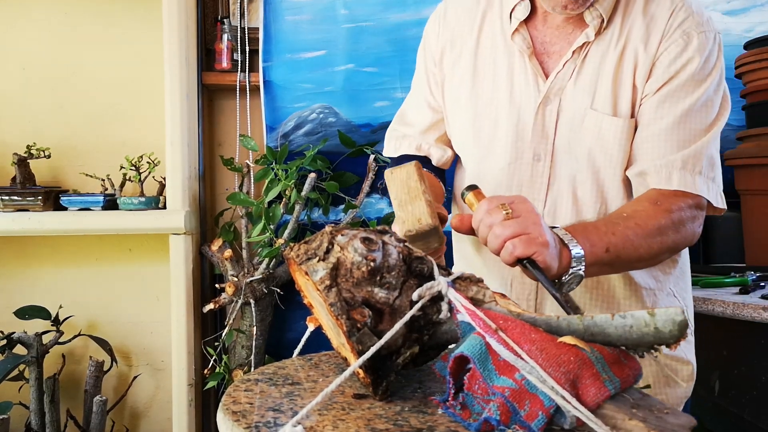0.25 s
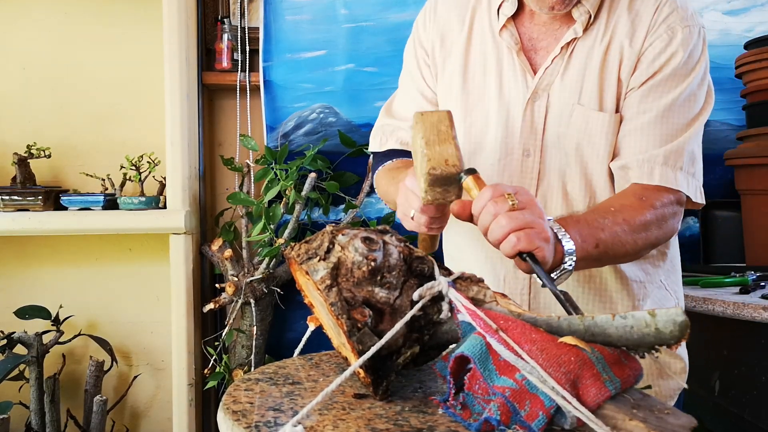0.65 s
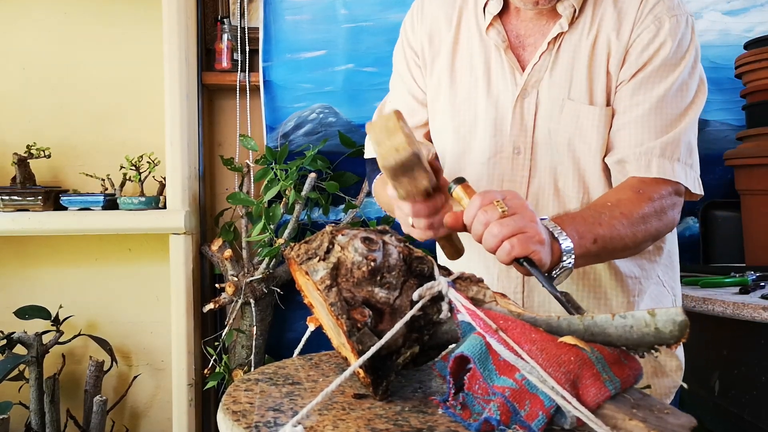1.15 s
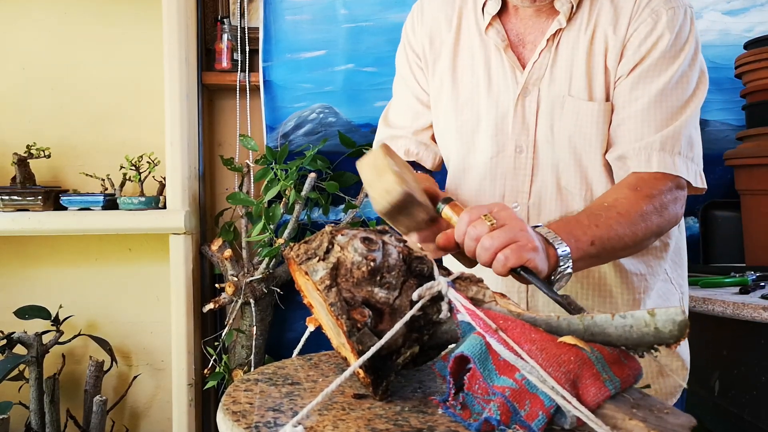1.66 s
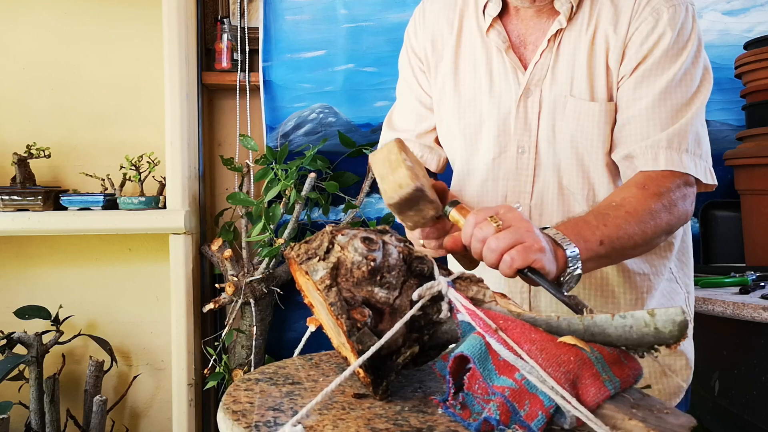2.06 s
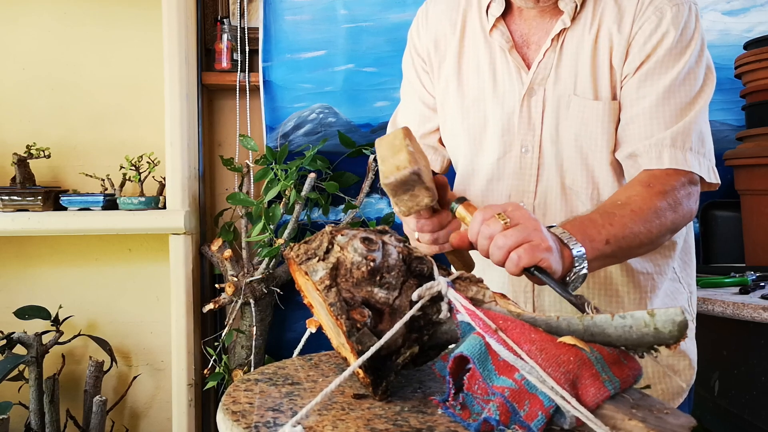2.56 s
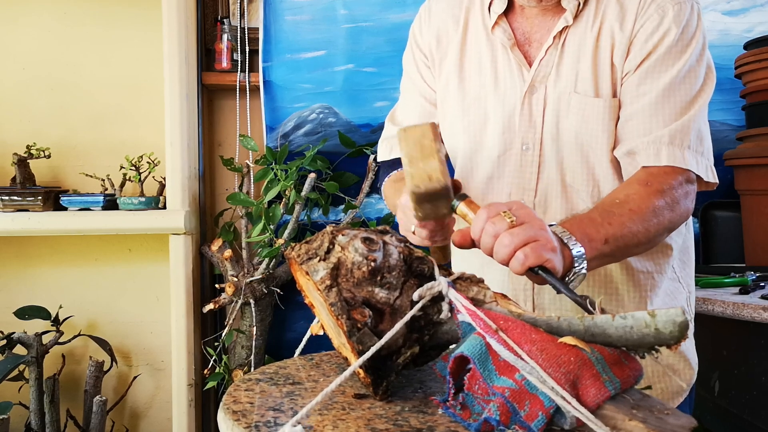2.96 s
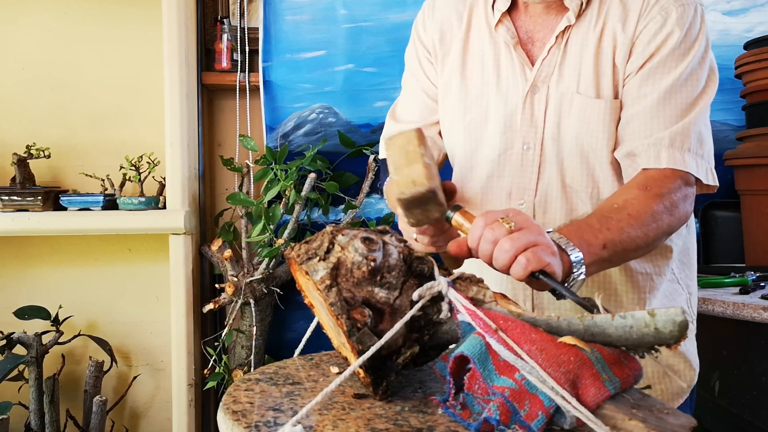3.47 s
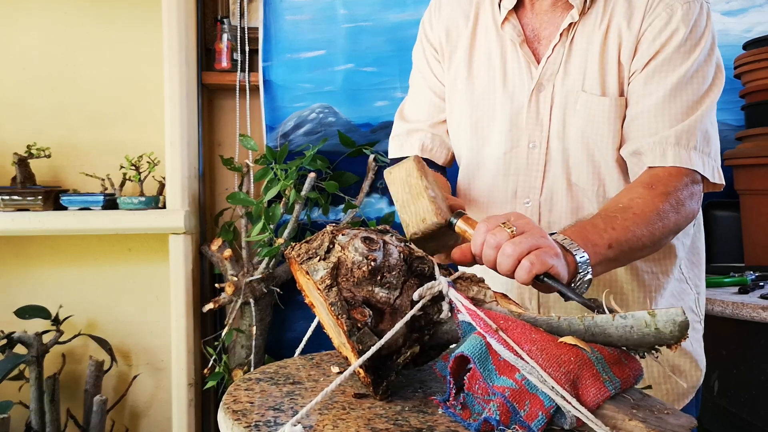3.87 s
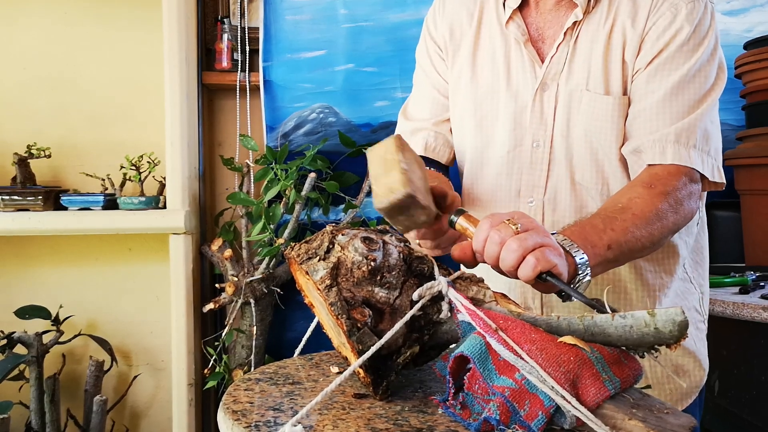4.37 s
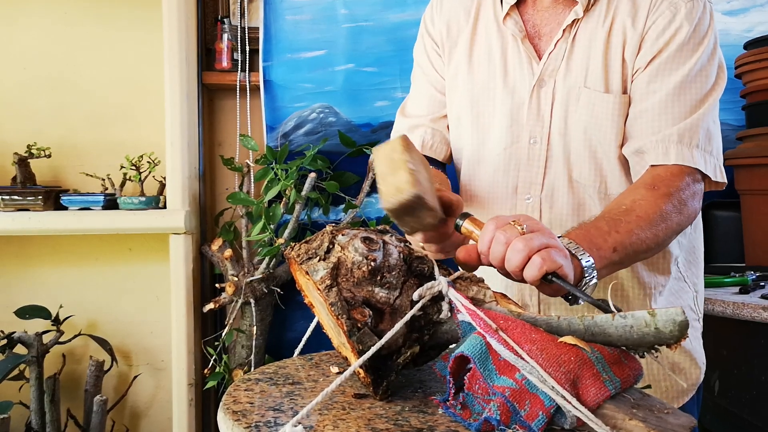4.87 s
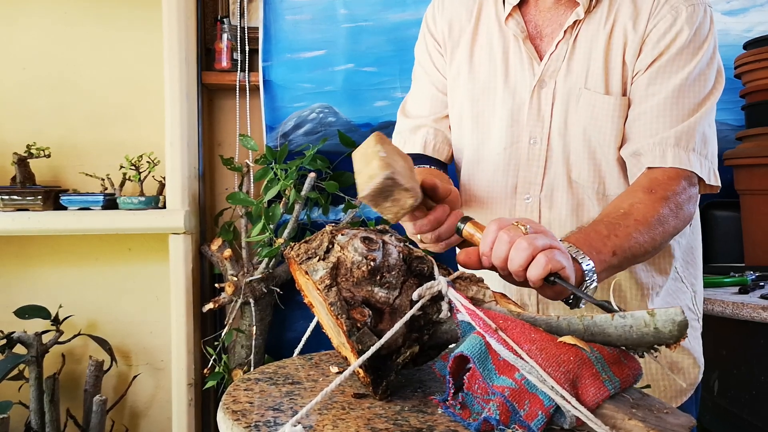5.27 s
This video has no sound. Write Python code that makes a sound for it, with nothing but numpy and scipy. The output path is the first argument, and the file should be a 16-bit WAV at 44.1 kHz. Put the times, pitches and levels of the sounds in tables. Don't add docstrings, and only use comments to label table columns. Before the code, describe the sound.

Steady hollow wooden knocks, about four a second, ring in a small workshop while a low engine rumble outside recedes.

```python
import sys
import numpy as np
from scipy import signal
from scipy.fft import rfft, irfft, next_fast_len
from scipy.io import wavfile
from scipy.ndimage import uniform_filter1d

SR = 44100
rng = np.random.default_rng(int(sys.argv[2]) if len(sys.argv) > 2 else 0)


def wav_out(sig):
    wavfile.write(sys.argv[1], SR, np.round(np.clip(np.atleast_2d(sig).T, -1, 1) * 32767).astype(np.int16))


def makeup_ratio(level_db):
    decades = np.asarray(level_db, float) / 20
    return 10 ** decades


N = 243096
T = np.arange(N) / SR

# (time [s], peak [dB], mallet head ring [Hz], handle share [dB], steel tick [dB])
BLOWS = [(0.697, -14.5, 1900, -7.5, -31), (0.981, -8, 1990, -11.5, -28.5), (1.264, -12, 1880, -11.5, -26.5),
         (1.513, -15, 2140, -13.5, -23.5), (1.754, -10, 1820, -15, -28.5), (1.999, -3, 2024, -17.5, -32.5),
         (2.228, -5, 2040, -14.5, -34.5), (2.466, -4.5, 2110, -16, -31), (2.705, -4, 2096, -11, -27),
         (2.965, -2, 2053, -10.5, -28), (3.193, -3.5, 1947, -10.5, -27), (3.43, -3, 2114, -8.5, -23.5),
         (3.65, -5.5, 1970, -5, -28.5), (3.887, -3, 2025, -9, -30.5), (4.111, -4.5, 2010, -12, -33.5),
         (4.317, -7, 1970, -17, -37.5), (4.537, -1.5, 2085, -12.5, -34), (4.755, -3, 2040, -6, -37.5),
         (4.976, -3, 2040, -6.5, -25.5), (5.2, -5, 1957, -1, -17.5), (5.426, -3, 2050, -4, -31.5)]
# (time [s], level [dB], load [dB])
ENGINE = [(0, 3, 3.5), (.35, 0.5, 1.5), (.6, 3.5, -4.5), (.75, -3, 0.5), (1, -1.5, 4.5), (1.5, -3, 2.5),
          (1.9, -4, -3), (2.3, -5.5, -2.5), (2.45, -3.5, 2.5), (2.85, -7.5, -2.5), (3.3, -9, -2.5),
          (4.3, -12.5, -1.5), (5, -15, 1.5), (5.51, -22, 0)]


def curves(table, s=T):
    t, *columns = np.transpose(table)
    return [np.interp(s, t, c) for c in columns]


def unit(x):
    return x / np.sqrt(np.mean(x ** 2))


def colour(x, points):
    hz, db = np.transpose(points)
    size = next_fast_len(x.shape[-1], True)
    f = np.arange(size // 2 + 1) * SR / size + 1e-3
    gain = makeup_ratio(np.interp(np.log(f), np.log(hz), db))
    return irfft(rfft(x, size) * gain, size)[..., :x.shape[-1]]


def band(x, lo_hz, hi_hz):
    return colour(x, [(lo_hz * .9, -80), (lo_hz * 1.03, 0), (hi_hz * .97, 0), (hi_hz * 1.1, -80)])


def walk(rate):
    k = int(SR / rate)
    held = np.repeat(rng.standard_normal(N // k + 1), k)
    return 0.99 * uniform_filter1d(uniform_filter1d(held, k), k)[:N]


def power(modes, db, wobble):
    f = np.arange(2049) * SR / 4096 + 1
    total = 0
    for (hz, width, mode_db), wobble_db in zip(modes, wobble):
        detuning = (f / hz - hz / f) * hz / width
        total = total + makeup_ratio(db + mode_db + wobble_db) ** 2 / (1 + detuning ** 2) ** 2
    return total


def response(spectrum):
    cepstrum = irfft(np.log(spectrum + 1e-12) / 2)
    cepstrum[1:2048] *= 2
    cepstrum[2049:] = 0
    return irfft(np.exp(rfft(cepstrum)))


def late(x, count):
    return np.r_[np.zeros(count), x[:len(x) - count]]


def mallet():
    # (time [s], trunk ring [Hz], handle ring [Hz], ferrule share [dB], low head ring [dB])
    grip = [(.7, 1400, 2990, -24, 1), (1.26, 1250, 2880, -23, -4.5), (1.75, 1310, 2350, -22.5, -5),
            (2.1, 1170, 2350, -15.5, 0), (2.9, 1450, 2620, -15, 3.5), (3.43, 1480, 2655, -11, 0.5),
            (4.2, 1530, 2835, -30, -10), (4.9, 1540, 2520, -17, -6), (5.3, 1420, 2670, -14.5, -6.5)]
    # (frequency [Hz], width [Hz], level [dB])
    trunk_modes = [(1250, 354, 1), (1450, 310, 1.5), (1717, 180, 0)]
    # (frequency [Hz], width [Hz], level [dB])
    handle_modes = [(2350, 1320, -1.5), (2630, 25, 3.5), (3011, 72, 5.5), (3200, 133, -4)]
    # (frequency [Hz], width [Hz], level [dB])
    ferrule_modes = [(3720, 1220, -0.5), (4270, 960, -13)]
    # (frequency [Hz], width [Hz], level [dB], drift as the work beds in [dB/s])
    bench_modes = [(330, 100, -11, -0.3), (390, 28, -14, 0.9), (430, 27, -10, 1.5), (730, 92, -9.5, 0),
                   (839, 126, -4, -0.15), (938, 72, -7, 2), (1077, 49, 1, 0.3)]
    # (frequency [Hz], width [Hz], level [dB])
    steel_modes = [(5280, 2130, -2.5), (7230, 1560, -2), (8620, 2200, -9), (10050, 620, -11.5),
                   (12700, 3300, -21), (14800, 1400, -30)]
    # (share at peak 0 dB [dB], rise as the blow softens [dB/dB], drift [dB/s])
    shares = (-19.5, 0.38, 0.53), (-31, 0.51, 0.79), (-5, 0.32, 0.081)
    off_spot_db_per_octave = 13.5

    near, far = np.zeros((2, N + 4096)), np.zeros((3, N + 4096))
    t = np.arange(64) / SR
    chance = rng.standard_normal((len(BLOWS), 2, 64))
    spot = np.array([1., 0, 0])
    for (s, db, hz, handle_db, tick_db), (wobble, rag) in zip(BLOWS, chance):
        trunk_hz, handle_hz, ferrule_db, low_db = curves(grip, s)
        trunk_db, bench_db, room_db = (share - rise * db + drift * s for share, rise, drift in shares)
        loose_db = -20 - 2.5 * s
        pan_db = -3 + 0.44 * s + 2.5 * wobble[-1]
        wobble = 1.2 * wobble

        head = power([(hz, 200, 0), (hz * 0.885, 150, low_db), (hz * 1.3, 1300, -13)], 0, wobble)
        under_gouge = [(f, width, level + 2.08 - off_spot_db_per_octave * abs(np.log2(f / trunk_hz)))
                       for f, width, level in trunk_modes]
        trunk = power(under_gouge + [(trunk_hz, 120, 3)], trunk_db + 6.0, wobble[4:])
        bedded = [(f, width, level + drift * s) for f, width, level, drift in bench_modes]
        bench = power(bedded, bench_db + 11, wobble[20:])
        bench = bench + power([(601, 730, 0.021)], loose_db + 4, wobble[30:])
        handle = power(handle_modes + [(handle_hz, 160, 3)], handle_db + 2, wobble[10:])
        handle = handle + power(ferrule_modes, ferrule_db + 3.5, wobble[34:])
        tick = power(steel_modes, tick_db + 6, wobble[40:])

        facing = power([(hz, 110, 4), (hz * 0.882, 200, low_db + 0.33)], 0, wobble[50:])
        wood = response(handle) + late(response(facing), count=8)
        wood += makeup_ratio(0.5) * late(response(trunk + makeup_ratio(5.5) * bench), count=30)
        wood += makeup_ratio(-17.0) * np.roll(wood, -50)
        push = .3 * rag * np.exp(-t / .0009) + (t == 0)
        crack = makeup_ratio(-5.0) * np.convolve(response(tick), push)[:4096]

        i = int((s + .0004) * SR)
        ears = np.array([late(wood, count=2) + late(crack, count=1), wood + crack])
        pan = np.array([[pan_db], [-pan_db]]) / 2
        near[:, i - 50:i + 4046] += makeup_ratio(db + 26.5 + pan) * np.roll(ears, 50, axis=1)

        around = uniform_filter1d(uniform_filter1d(head + trunk + handle, size=9), size=9)
        spot = spot + .45 * rag[-3:]
        spot = spot / np.linalg.norm(spot)
        to_walls = response(around + bench + tick)
        far[:, i:i + 4096] += makeup_ratio(db + 25.5 + room_db) * spot[:, None] * to_walls
    return near[:, :N], far[:, :N]


def bench_top():
    # (frequency [Hz], level [dB], likeness of left to right [-1 to 1])
    hum = [(402, -37, .4), (462, -40, -.2)]
    rise_s, t60_s = .022, .28
    t, kicks = np.arange(SR // 3) / SR, np.zeros((len(hum), N))
    s, db = np.transpose(BLOWS)[:2]
    scatter_db = 1.6 * rng.standard_normal((len(BLOWS), len(hum))).T
    kicks[:, (s * SR).astype(int)] = makeup_ratio(0.82 * db + scatter_db)
    shape = (1 - np.exp(-(t / rise_s) ** 2)) * np.exp(-np.log(1000) * t / t60_s)
    out = 0
    for kick, (hz, level_db, like) in zip(kicks, hum):
        ring = signal.fftconvolve(kick, shape * np.exp(2j * np.pi * hz * t))[:N]
        turn = np.exp(np.array([[0], [1j]]) * np.arccos(np.clip(like, -1, 1)))
        out = out + makeup_ratio(level_db) * np.real(ring * turn)
    return out


def workshop(x):
    # (frequency [Hz], t60 [s], level [dB])
    room = [(345, 0.37, 8), (723, 0.38, 11), (1473, 0.3, 5.5), (2740, 0.3, 1.5), (5730, 0.28, 0.5),
            (9700, 0.28, 1.5)]
    # (delay [s], spread [s], level over the tail [dB])
    echoes = [(.0038, 0.00034, -1.5), (.008, 0.0004, -7), (.013, .001, -11.5), (.029, 0.00067, -4.5)]
    t = np.arange(SR // 2) / SR
    tail = 0
    for hz, t60, db in room:
        octave = [(hz / 2.2, -40), (hz / 1.6, -5), (hz, 0), (hz * 1.6, -5), (hz * 2.2, -40)]
        noise = colour(rng.standard_normal((2, 3, len(t))), octave)
        tail = tail + makeup_ratio(db) * noise * np.exp(-np.log(1000) * t / t60)
    swell = 1 + sum(makeup_ratio(db) * np.exp(-((t - delay) / spread) ** 2) for delay, spread, db in echoes)
    onset = np.clip((t - .0008) / .002, 0, 1)
    tail = makeup_ratio(-25) * tail * swell * onset
    answer = signal.fftconvolve(x[None], tail, axes=2)[..., :N].sum(axis=1)
    return answer * makeup_ratio(np.array([[-.6], [.6]]))


def engine():
    # (time [s], rate [Hz])
    cycle = [(0, 15.8), (.45, 15.5), (1, 14.9), (1.5, 14.4), (1.75, 14.1), (1.95, 14.4), (2.25, 16.1),
             (2.5, 17), (2.75, 15.8), (3, 13.7), (3.25, 13.35), (4, 13.4), (4.25, 13.1), (4.5, 15.2),
             (5, 15.7), (5.51, 16)]
    # (frequency [Hz], level [dB])
    exhaust = [(30, -47), (50, -14.5), (80, 6.5), (94, -9), (110, 1), (134, -2.5), (155, 7), (185, -8.5),
               (203, -11.5), (225, -18), (340, -32.5), (440, -54.5)]
    edges_hz = (55, 85, 105, 135, 185, 330)
    # (level [dB], share of the fading [dB/dB], share of the load [dB/dB], flutter [dB])
    paths = [(-30.5, 0.57, 0.98, 1.2), (-29.5, 0.35, -0.37, 3.5), (-30, 1.21, 0.28, 5),
             (-33, 1.27, -0.33, 3), (-42.5, 0.79, 0.19, 3), (-39, 0.48, -0.51, 4.5)]
    # (frequency [Hz], width [Hz], level [dB], share of the fading [dB/dB])
    air_modes = [(154.8, 6.9, -37.5, 0.9), (172.2, 5.1, -44, 0.58), (205.3, 7.4, -47, 0.31)]

    hz, (away_db, load_db) = curves(cycle)[0], curves(ENGINE)
    turns = np.cumsum(hz) / SR
    lines = 0
    for k in range(3, 20):
        level = makeup_ratio(.25 * k * walk(3))
        phase = k * turns + rng.random() + .009 * k * walk(6)
        lines = lines + level * np.sin(2 * np.pi * phase)
    roar = unit(band(rng.standard_normal(N), 40, 345))
    source = colour(unit(lines) + makeup_ratio(-7) * roar, exhaust)

    *levels_db, rumble_db = [db + share * away_db + pull * load_db + flutter_db * walk(6)
                             for db, share, pull, flutter_db in paths]
    out = 0
    for lo, hi, db in zip(edges_hz, edges_hz[1:], levels_db):
        part = band(source, lo, hi)
        out = out + makeup_ratio(db) * part / np.sqrt(uniform_filter1d(part ** 2, size=SR // 9) + 1e-18)
    for mode_hz, width, db, share in air_modes:
        resonator = signal.iirpeak(mode_hz, mode_hz / width, fs=SR)
        ring = unit(signal.lfilter(*resonator, band(rng.standard_normal(N), 150, 230)))
        out = out + makeup_ratio(db + share * away_db) * ring
    return out + makeup_ratio(rumble_db) * unit(band(rng.standard_normal(N), 27, 55))


def air():
    # (frequency [Hz], density [dB per Hz])
    hiss_colour = [(180, -33.5), (300, -13.5), (392, -31.5), (1320, -28.5), (1560, -24.5), (2930, -32.5),
                   (3190, -35.5), (4370, -39), (7080, -43), (10400, -54.5), (16000, -71)]
    # (time [s], level [dB])
    hiss_db = [(0, -57.5), (.25, -55.5), (.5, -52.5), (.7, -55.5), (1.3, -57.5), (3, -58.5), (5.5, -58)]
    level = makeup_ratio(curves(hiss_db)[0] + 5 + 1.0 * walk(6.3))
    hiss = unit(colour(rng.standard_normal((2, N)), hiss_colour)) * level
    bass = [(15, -13), (30, -16), (100, 10.5), (200, 5.5), (300, -24), (450, -68)]
    stray = unit(colour(rng.standard_normal(N), bass))
    return hiss + makeup_ratio(1.1 * curves(ENGINE)[0] - 45.5) * stray * np.array([[1], [-1]])


def scene():
    near, far = mallet()
    near = signal.sosfilt(signal.butter(4, 480, "high", fs=SR, output="sos"), near)
    return near + workshop(far) + engine() + air() + makeup_ratio(3.5) * bench_top()


def top_cut(x):
    return signal.sosfilt(signal.butter(12, 16370, fs=SR, output="sos"), x)


def record(dry):
    mid = dry.mean(axis=0)
    side = colour((dry[0] - dry[1]) / 2, [(9500, 0), (12000, -5.5)])
    rounded = np.tanh(.85 * np.array([mid + side, mid - side])) / .85
    top = signal.butter(10, 15600, fs=SR, output="sos")
    mix = signal.sosfilt(top, rounded)
    return top_cut(mix)


dry = scene()
out = record(dry)
wav_out(out)
```